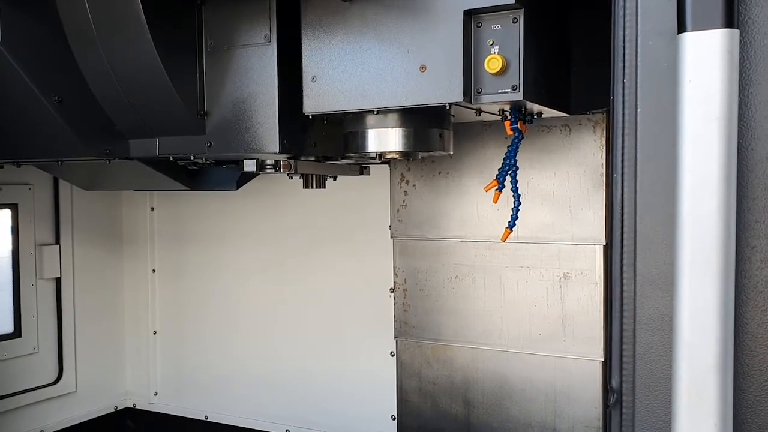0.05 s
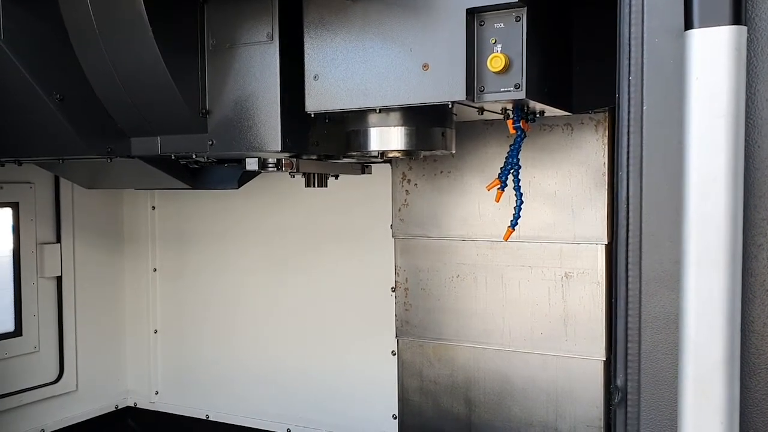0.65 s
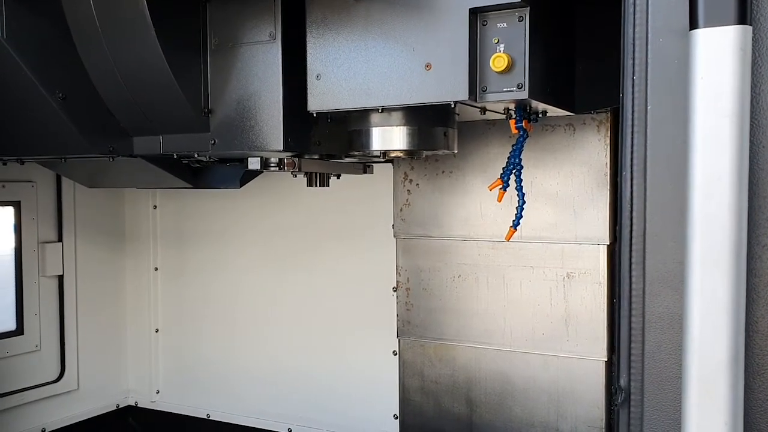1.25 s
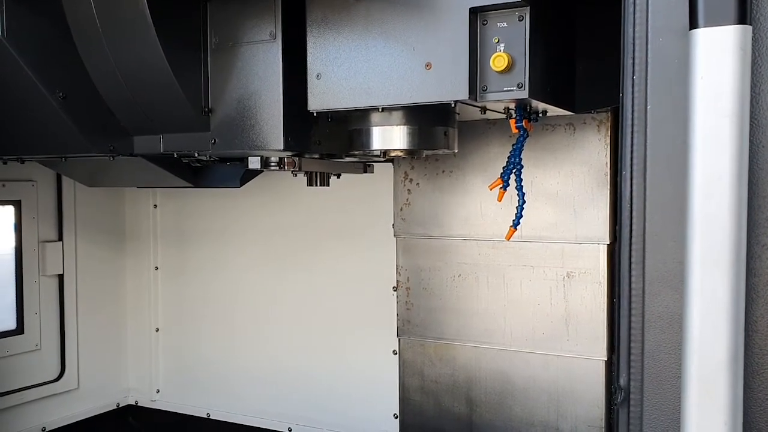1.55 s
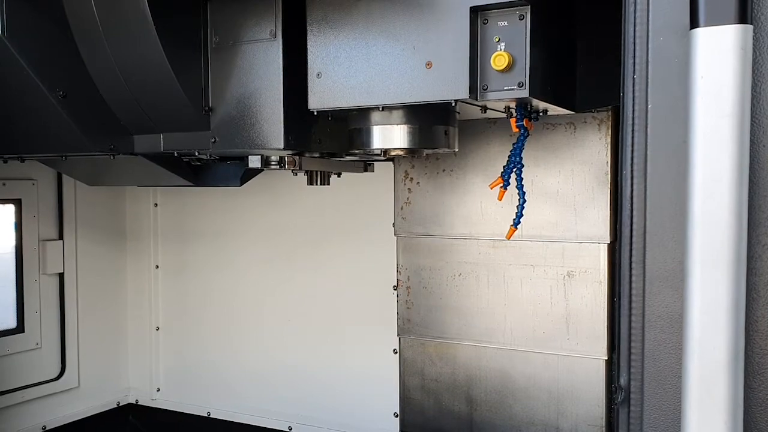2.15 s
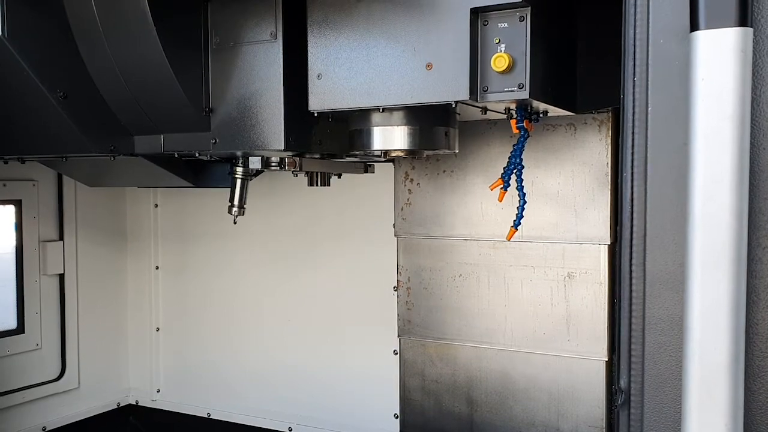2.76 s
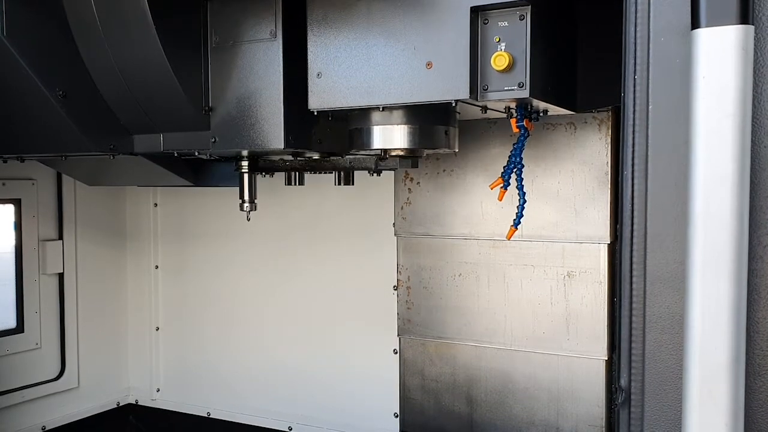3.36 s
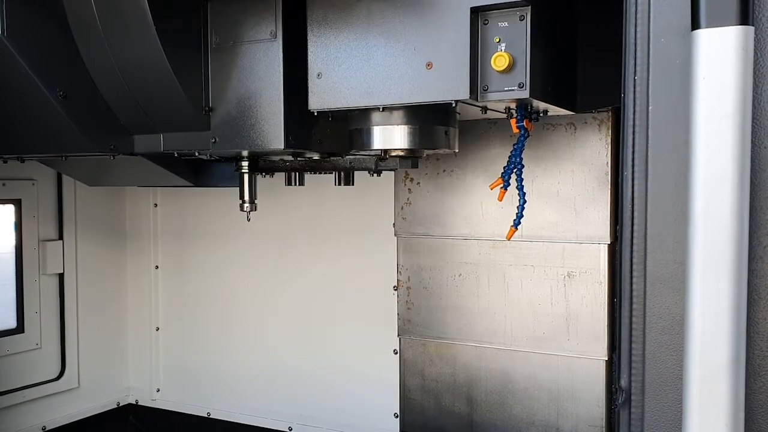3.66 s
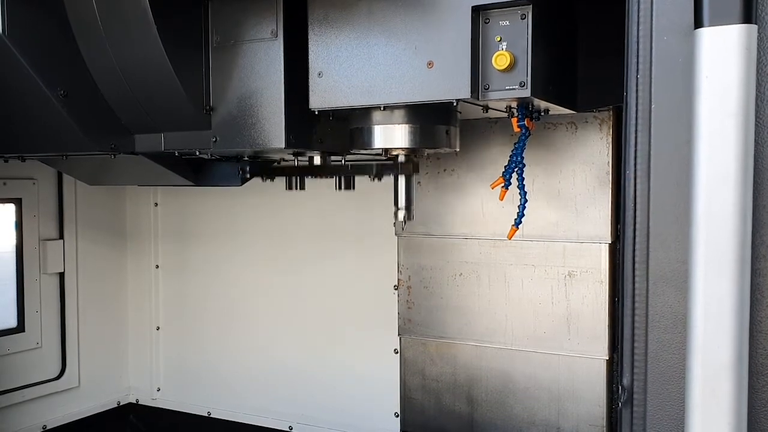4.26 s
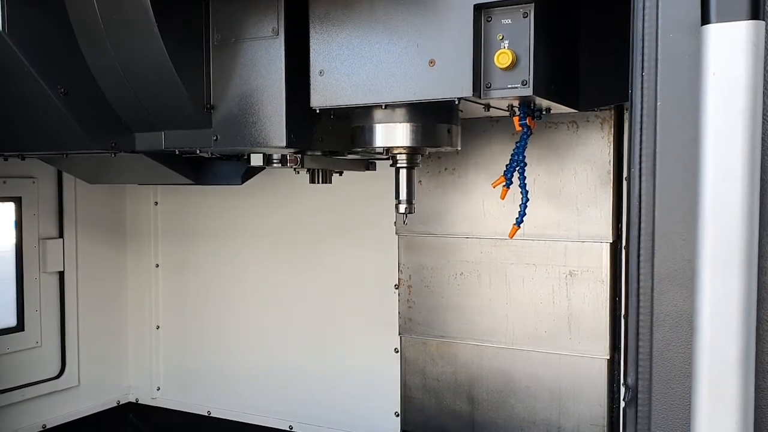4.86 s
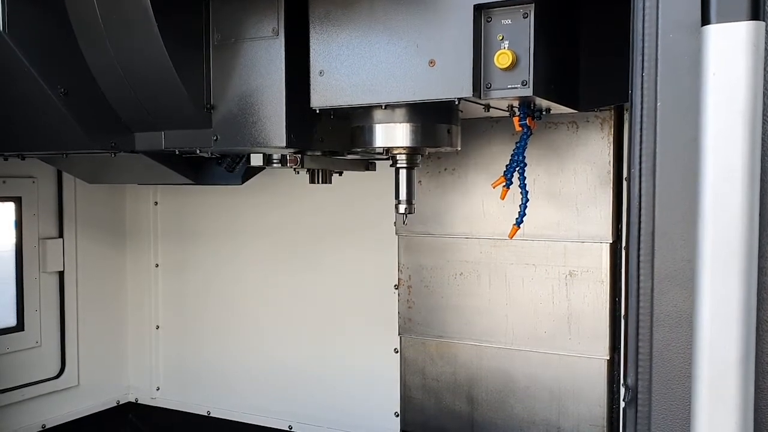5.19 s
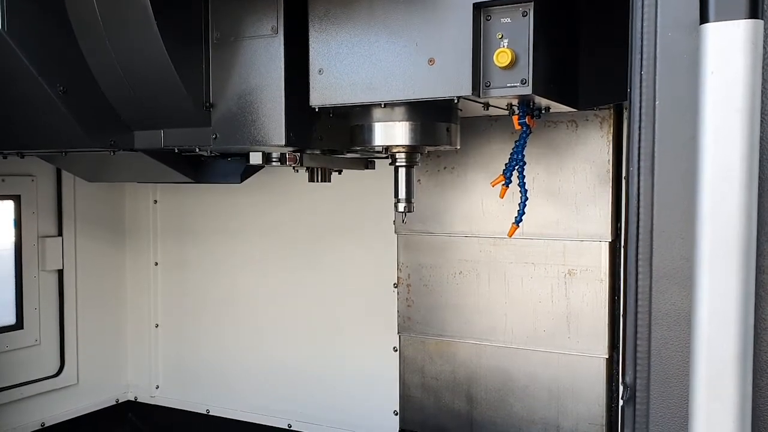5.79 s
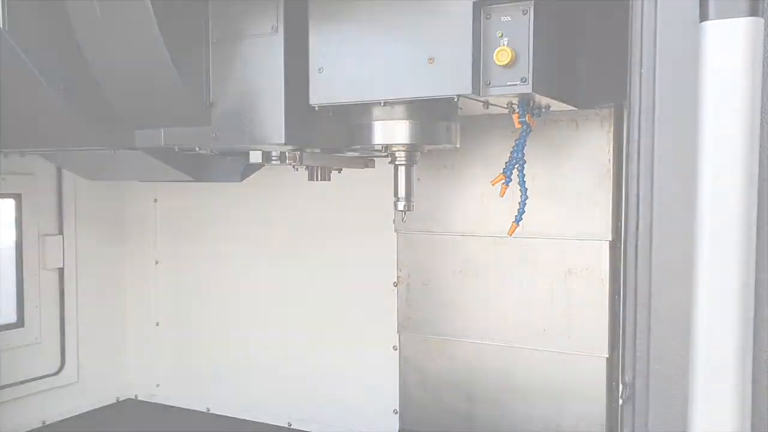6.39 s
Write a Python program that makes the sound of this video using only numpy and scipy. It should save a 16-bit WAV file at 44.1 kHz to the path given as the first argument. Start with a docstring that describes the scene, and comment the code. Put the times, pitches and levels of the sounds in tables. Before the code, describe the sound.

A machine tool hums low and steadily with a thin air leak, heard close at the open door of its sheet-steel cabin. In the first 0.7 seconds a draught buffets the microphone on the right, with one faint rising squeak. At about 2.1 seconds a valve spits, then an air cylinder vents with a clunk and a sharp half-second hiss. From 3.3 seconds the tool changer arm snaps on with a bright click, several metallic knocks and a gearbox rumble. At 3.7 seconds comes the loudest sound, a blast of compressed air that roars, howls and hisses with a very high whistle, over further knocks. It narrows to a hiss and stops at 4.4 seconds, followed by a few clunks. At 4.8 seconds a knock and a softer half-second hiss follow. The hum continues until the end at about 6.4 seconds.

```python
"""Purge air roars, howls and hisses through the empty spindle taper of a machining centre in a tool change.
Heard at the open door of its sheet-steel cabin, over machine hum and a steady air leak. A cylinder
swings the tool pot down, the changer arm rumbles and knocks into the holders, the air blows until the
new tool is clamped, and the pot swings back. Early on, the head squeaks and a draught buffets the
right microphone port."""
import sys
import numpy as np
from scipy import signal
from scipy.fft import rfft, irfft
from scipy.io import wavfile
from scipy.ndimage import uniform_filter1d, map_coordinates

SR = 44100
rng = np.random.default_rng(int(sys.argv[2]) if len(sys.argv) > 2 else 0)


def generate_wav(signal):
    """Clip the signal to [-1, 1] and save it as 16-bit WAV at the path in sys.argv[1]."""
    frames = np.transpose(np.atleast_2d(signal))
    scaled = np.clip(frames, -1, 1) * 32767
    pcm = np.round(scaled).astype(np.int16)
    wavfile.write(sys.argv[1], SR, pcm)


N = 283563
T = np.arange(N) / SR
HZ = np.maximum(np.arange(N // 2 + 1) * SR / N, 1)
SIDES = np.array([[1], [-1]])
PURGE_OPEN_S, HOLDER_FREE_S, HOLDER_SEATS_S, PURGE_SHUT_S = 3.668, 3.724, 4.243, 4.388
SQUEEZE_S, END_S = 0.026, 6.39

# Stereo width in the cabin: freq_hz, side_minus_mid_db
CABIN_WIDTH = [(50, -11.5), (150, -16.5), (400, -10), (750, -4), (1300, -2), (4000, -2), (8000, 1),
               (15000, -4)]
# Background contour: time_s, hum_gain_db, leak_gain_db
IDLE_GAINS = [(.25, -35.5, -38.5), (.45, -36, -41), (.645, -38.5, -41), (.675, -39.5, -45),
              (1.7, -40.5, -44.5), (2.15, -37.5, -41.5), (3.55, -35.5, -43), (4.6, -47, -49.5),
              (5.4, -44.5, -48), (6.3, -39, -41)]
# Machine drone: freq_hz, density_db
HUM_SPECTRUM = [(25, -12), (45, -3.5), (70, 0), (100, -1), (160, -6), (250, -7), (330, -5.5), (480, -12.5),
                (570, -11.5), (660, -15), (1000, -22), (1150, -19), (1800, -27), (2100, -26), (3000, -33),
                (8000, -33)]
# Motor and fan lines: pitch_hz, relative_db
HUM_LINES = [(117, -13), (188, -16), (334, -16), (562, -12), (775, -21), (1120, -21)]
# Spindle air seal: freq_hz, density_db
LEAK_SPECTRUM = [(1500, -9), (3000, -3.5), (5000, -4.5), (7300, -15), (8300, -6.5), (9200, 1), (12000, 1),
                 (14000, -2), (16000, -5.5)]
# Draught rumble: freq_hz, density_db
DRAUGHT_SPECTRUM = [(20, -4), (60, 9.5), (150, 5), (330, -16), (600, -30), (1500, -65)]
# Draught gusts: start_s, end_s, level_db
DRAUGHT_GUSTS = [(0, 0.46, -39), (.345, 0.41, -21.5), (.44, 0.658, -28)]
# Eddies on the right microphone port: time_s, level_db, pitch_hz
EDDIES = [(0.385, -8, 83), (.394, -11, 353), (0.4699, -14.5, 525), (.472, -9.5, 328), (0.475, -4.5, 170),
          (0.483, -8, 256), (0.555, -10, 91)]
# Squeak of the head: time_s, pitch_hz, level_db
SQUEAK_PATH = [(.3, 2250, -75), (.335, 2340, -47), (.352, 2470, -42), (.38, 2850, -62), (.395, 2950, -73)]
# Pilot valve: freq_hz, density_db
VALVE_SPECTRUM = [(1500, -14), (4800, -3.5), (6100, 7), (7500, -11), (10500, 1), (12500, 8.5), (16000, -16)]
# Pilot valve spits: start_s, level_db
VALVE_SPITS = [(2.098, -24.5), (4.817, -33.5)]
# Pot cylinder exhaust: freq_hz, density_db
EXHAUST_SPECTRUM = [(300, -51.5), (800, -4.5), (1400, -1), (2000, -2), (3000, 2), (3700, 0), (5500, -5.5),
                    (7500, -14), (10000, -6.5), (16000, -9.5)]
# Pot swings, down and back: start_s, end_s, exhaust_db, ring_hz, ring_width_hz, ring_db
POT_SWINGS = [(2.168, 2.682, -36, 4270, 280, -40), (4.828, 5.386, -44.5, 3050, 1200, -59)]
# Cam gearbox rumble: freq_hz, density_db
GEARBOX_SPECTRUM = [(25, -12), (50, 6), (90, 2.5), (170, -1), (270, -12.5), (390, 0), (520, -19),
                    (900, -24.5), (2000, -29), (6000, -39.5)]
# Arm strokes (grip, pull, swing, lift, home): middle_s, half_length_s, rumble_db, shudder_db, whirr_db
ARM_STROKES = [(3.316, 0.13, -38, -57, -29), (3.75, 0.059, -29, -27, -60), (3.954, 0.13, -34, -45, -55),
               (4.31, 0.14, -36, -34, -46), (4.562, 0.1, -29, -45, -33)]
# Blows of the tool pot (near 2.2 s and 4.83 s) and of the changer: start_s, thud_db, thud_centre_hz,
# base_t60_s, click_db, tilt_db_per_octave
BLOWS = [(2.171, -20.5, 195, 0.24, -30.5, -2.5), (2.177, -27.5, 560, 0.43, -46, -6),
         (2.203, -35, 100, 0.18, -48, -1), (2.376, -31, 100, 0.092, -54, -4),
         (3.294, -24.5, 520, 0.76, -19.5, 2), (3.311, -25, 420, 0.32, -35.5, -7),
         (3.338, -23.5, 380, 0.23, -44, -1), (3.451, -12.5, 810, 0.09, -25.5, 2.5),
         (3.477, -26, 753, 0.49, -45, 2), (3.488, -24, 520, 0.1, -40, 1), (3.723, -22, 400, 0.14, -29, 8),
         (3.733, -16.5, 224, 0.31, -29, -4), (3.785, -23, 165, 0.24, -18.5, 1),
         (4.296, -23.5, 403, 0.25, -36.5, -6), (4.388, -31.5, 1417, 0.13, -29, 3),
         (4.473, -25, 129, 0.1, -63, 14), (4.530, -36, 83.5, 0.33, -25, 2),
         (4.547, -25.5, 430, 0.22, -61, 3), (4.828, -29, 158, 0.29, -34, -2)]
# Modes of the panels and changer: pitch_hz, weight_db, t60_factor
PANEL_MODES = [(91, 8, 0.79), (150, 5.5, 0.85), (159.6, 15, 1.1), (195, 3, 1.1), (232, 8.5, 0.76),
               (261, 3.5, 0.99), (323, 5.5, 0.98), (371, 2.5, 1.44), (455, 2, 0.42), (505, -14, 0.89),
               (654, 0.5, 0.85), (743, -2.5, 2.05), (906, -4.5, 0.84), (1223, -8.5, 1.5), (1134, -15, 2.6)]
# Steel-on-steel click: freq_hz, density_db
CLICK_SPECTRUM = [(300, 10), (1200, 18.5), (2300, 12), (3200, 13.5), (4500, 13), (6000, 8), (8500, -0.5),
                  (9600, 8), (11000, -11), (16000, -13)]
# Modes of the steel gripper: pitch_hz, relative_db, t60_s
GRIPPER_MODES = [(3340, -43, 0.12), (4480, -35, 0.2), (6632, -38.5, .1)]
# Air column of the taper and the gap under it: centre_hz, width_hz, weight_db
TAPER_MODES = [(731, 64, -3), (802, 60, -6), (898, 97, -8.5), (1126, 130, -11), (1293, 75, -7.5),
               (1475, 70, -6.5), (2070, 86, -5), (2196, 120, -7), (2330, 60, -14), (2800, 110, -16),
               (3210, 84, -10), (3410, 130, -11.5), (4010, 44, -15.5), (5320, 64, -15), (5730, 81, -22),
               (6090, 70, -19)]
# Lowest taper resonance, rising as the gap opens, sinking as it closes: time_s, pitch_hz, level_db
HOWL_PATH = [(3.68, 755, -26), (3.76, 785, -30.5), (3.85, 796, -27.5), (4.04, 798, -24.5), (4.19, 796, -29),
             (4.26, 738.7, -37), (4.30, 723, -33), (4.36, 682, -43)]
# Higher taper resonances, catching in turn: start_s, pitch_hz, level_db, stereo_phase_rad
OVERBLOWN_MODES = [(3.670, 2077, -28.5, 0.1), (3.689, 3406, -27.5, -0.5), (3.70, 5280, -38.5, 0.6)]
# Purge jet hiss: freq_hz, density_db
JET_SPECTRUM = [(500, -11.5), (1000, -14.5), (1700, -6.5), (2500, 0), (3700, 2), (4600, -3.5), (5500, -0.5),
                (7000, -2.5), (8200, -6), (9000, 1), (9700, 6), (11500, 1.5), (14500, -6), (16000, -6)]


def undb(db):
    """Decibels to gain."""
    return 10 ** (np.asarray(db) / 20)


def unit(x):
    """Scale to rms 1."""
    return x / np.sqrt(np.mean(x ** 2))


def pan(left_minus_right_db):
    """Left and right gains."""
    return undb(SIDES * left_minus_right_db / 2)


def curves(rows):
    """Each value column of a timed table, at every sample."""
    times_s, *columns = np.transpose(rows)
    return [np.interp(T, times_s, column) for column in columns]


def burst(start_s, end_s, rise_s, release_s):
    """Envelope: rise, hold, exponential release."""
    attack = 1 - np.exp(-np.maximum(T - start_s, 0) / rise_s)
    return attack * np.exp(-np.maximum(T - end_s, 0) / release_s)


def swell(middle_s, half_s):
    """Bell-shaped envelope."""
    return np.exp(-((T - middle_s) / half_s) ** 2)


def ramp(start_s, length_s):
    """Linear rise from 0 to 1, then held."""
    return np.clip((T - start_s) / length_s, 0, 1)


def walk(rate_hz):
    """Smoothed random steps, spread near 1."""
    step = max(int(SR / rate_hz), 1)
    held = rng.standard_normal(N)[np.arange(N) // step]
    return 1.404 * uniform_filter1d(uniform_filter1d(held, step), step)


def colour(points):
    """Gain per frequency from a spectrum table."""
    hz, db = np.transpose(points)
    return undb(np.interp(np.log(HZ), np.log(hz), db))


def resonance(hz, width_hz):
    """Gain per frequency of one resonance, 1 at its centre."""
    return (1 + ((HZ ** 2 - hz ** 2) / (HZ * width_hz)) ** 2) ** -.5


def tone(hz, phase_rad=0):
    """Sine of rms 1 following a pitch."""
    return np.sqrt(2) * np.sin(2 * np.pi * np.cumsum(hz) / SR + phase_rad)


def noise(gain):
    """Mono turbulence of a given spectrum, rms 1."""
    return unit(irfft(rfft(rng.standard_normal(N)) * gain, N))


def diffuse(gain, width_db=0, ripple_hz=291, wall_share=0.5):
    """Stereo turbulence: near walls shift its phase, late echoes are unrelated, the bass stays alike."""
    direct, late = (rng.standard_normal((2, len(HZ))) + 1j * rng.standard_normal((2, len(HZ)))) * gain
    turns_rad = np.cumsum(np.pi * rng.uniform(-1, 1, size=256))
    wall_phase_rad = np.interp(HZ / ripple_hz, np.arange(256), turns_rad)
    early = 1j * direct * np.sqrt(2) * np.sin(wall_phase_rad)
    echoes = np.sqrt(wall_share) * early + np.sqrt(1 - wall_share) * late
    side = colour(CABIN_WIDTH) * undb(width_db) * echoes
    return unit(irfft(direct + SIDES * side, N))


def band(hz, width_hz):
    """Stereo turbulence through a resonance applied twice."""
    return diffuse(resonance(hz, width_hz) ** 2)


def comb(depth_db=4, spacing_hz=207.5):
    """Irregular spectral peaks and dips from standing waves between the walls."""
    ripple = rng.uniform(-np.sqrt(3), np.sqrt(3), size=256)
    return undb(depth_db * np.interp(HZ / spacing_hz, np.arange(256), ripple))


def waver(x, depth):
    """Unsteady flow pushes resonances up and down."""
    drift = depth * walk(45)
    position = np.arange(N) + np.cumsum(drift - drift.mean())
    return np.array([map_coordinates(channel, [position], mode="mirror") for channel in x])


def cabin(x, wet_db, t60_s=0.36, damping=0.74):
    """Dense stereo reflections between steel walls; the treble dies first."""
    echoes = rng.standard_normal((2, SR))
    dull = signal.sosfilt(signal.butter(2, 4500, fs=SR, output="sos"), echoes)
    fade = undb(-60 * T[:SR] / t60_s)
    tail = (dull * fade + (echoes - dull) * fade ** (1 + damping)) * (T[:SR] > .002)
    response = undb(wet_db) * unit(tail) / np.sqrt(SR)
    response[:, 0] += 1
    return signal.fftconvolve(np.atleast_2d(x), response, axes=1)[:, :N] / np.sqrt(1 + undb(2 * wet_db))


def idle(pump_hz=47.5, throb_end_s=3, boom_start_s=4.75):
    """Fans and motors drone and whine, pumps throb and boom, the spindle's air seal leaks."""
    hum_db, leak_db = curves(IDLE_GAINS)
    drone = diffuse(colour(HUM_SPECTRUM)) * undb(hum_db + 4 + 0.46 * walk(9))
    lines = sum(tone(hz + 6 * walk(40)) * undb(db + 3.9 * walk(22)) for hz, db in HUM_LINES)
    fan_whine = band(2104, 91) * undb(-17.5 + 2 * walk(10))
    hum = drone + (lines + fan_whine) * undb(hum_db)
    throb_gain = undb(-41.5) * burst(0, throb_end_s, .01, 0.18) + undb(-54.5)
    throb = noise(resonance(pump_hz, 5) ** 2) * throb_gain
    boom = band(82, 70) * undb(-65) * burst(boom_start_s, END_S, 0.3, 0.3)
    leak = cabin(diffuse(colour(LEAK_SPECTRUM)), wet_db=-4) * undb(leak_db + 3.5 + 0.64 * walk(13))
    return hum * pan(1) + throb + boom + leak * pan(0.45)


def draught(eddy_half_cycles=0.79, eddy_left_db=-24, ramp_s=0.0071):
    """Gusts rumble on the microphone ports; single eddies thump the right one."""
    eddies = 0
    for time_s, db, hz in EDDIES:
        wave = np.cos(2 * np.pi * (hz * (T - time_s) + rng.random()))
        eddies += undb(db) * swell(time_s, eddy_half_cycles / hz) * wave
    rumble = np.array([noise(colour(DRAUGHT_SPECTRUM)) for _ in range(2)])
    gusts = sum(undb(db) * burst(start_s, end_s, ramp_s, ramp_s) for start_s, end_s, db in DRAUGHT_GUSTS)
    return rumble * gusts * pan(-11.5) + eddies * undb([[eddy_left_db], [0]])


def squeak(jitter_hz=50):
    """One faint rising squeak from the moving head."""
    pitch_hz, level_db = curves(SQUEAK_PATH)
    return cabin(tone(pitch_hz + jitter_hz * walk(360)) * undb(level_db), wet_db=-1) * pan(5.4)


def pot_cylinder(rise_s=0.00066, puff_db=10.5, surge_db=2, overtone_ratio=1.26, rest_ring=0.37):
    """A valve spits, the cylinder vents raggedly; its port rings more as the pot gathers speed."""
    spits = sum(undb(db) * burst(start_s, start_s, rise_s, 0.038) for start_s, db in VALVE_SPITS)
    valve = diffuse(colour(VALVE_SPECTRUM)) * spits
    air = diffuse(colour(EXHAUST_SPECTRUM) * np.sqrt(comb()))
    vent = 0
    for start_s, end_s, exhaust_db, ring_hz, width_hz, ring_db in POT_SWINGS:
        puff = undb(puff_db) * burst(start_s, start_s, rise_s, 0.098)  # stored pressure escapes first
        piston_flow = burst(start_s, end_s, rise_s, 0.081)
        flow = np.hypot(piston_flow, puff)
        speed = np.sin(np.pi * ramp(start_s, end_s - start_s) ** 2.3)  # peaks late, then cushioned
        overtone = undb(-3.5) * resonance(ring_hz * overtone_ratio, width_hz) ** 2
        ring = waver(diffuse(resonance(ring_hz, width_hz) ** 2 + overtone), depth=0.028)
        vent += air * undb(exhaust_db + surge_db * speed) * flow
        vent += ring * undb(ring_db) * (speed + rest_ring * flow)
    return cabin(valve + vent * undb(2.15 * walk(220)), wet_db=-0.5) * pan(1.1)


def changer_arm(start_s=3.2, stop_s=4.8, motor_db=-36.5, casing_hz=392, shudder_hz=66):
    """The motor-driven cam gearbox rumbles; each stroke loads it, shakes the frame, whirrs the gears."""
    motor = undb(motor_db) * burst(start_s, stop_s, 0.17, 0.17)
    load, shake, mesh = sum(undb(levels_db)[:, None] * swell(middle_s, half_s)
                            for middle_s, half_s, *levels_db in ARM_STROKES)
    rumble = diffuse(colour(GEARBOX_SPECTRUM)) * np.hypot(motor, load) * undb(2 * walk(35))
    whirr = band(casing_hz, 150) * mesh * pan(0.82)
    shudder = band(shudder_hz, 60) * shake
    return rumble + whirr + shudder


def knocks(ring_db=-4.5, rattle_db=-2, click_t60_s=0.073, contact_t60_s=0.021, rise_s=0.00037):
    """Blows click steel on steel, ring panels and rattle covers; softer contact favours lower modes."""
    size = 40000
    t = T[:size]
    thuds, clicks = np.zeros(N + size), np.zeros((2, N + size))
    mode_hz, mode_db, t60_factor = np.transpose(PANEL_MODES)[:, :, None]
    covers = np.array([noise(resonance(hz, hz * 0.29) ** 3) for hz in mode_hz[:, 0]])
    steel_spectrum = rfft(diffuse(colour(CLICK_SPECTRUM)))
    for start_s, thud_db, centre_hz, base_t60_s, click_db, tilt_db_per_octave in BLOWS:
        start = int(start_s * SR)
        span = slice(start, start + size)
        weights = undb(mode_db) * np.exp(-(np.log(mode_hz / centre_hz) / 0.79) ** 2)
        detuned_hz = mode_hz * (1 + 0.0062 * rng.standard_normal(mode_hz.shape))
        modes = undb(ring_db) * np.sin(2 * np.pi * detuned_hz * t) + undb(rattle_db) * covers[:, span]
        decays = undb(-60 * t / (base_t60_s * t60_factor))
        thud = np.sum(weights * modes * decays, axis=0) / np.linalg.norm(weights)
        thuds[span] += undb(thud_db) * thud * (1 - np.exp(-t / rise_s))

        tilt = undb(tilt_db_per_octave * np.log2(np.maximum(HZ, 1000) / 4000))
        crack_decay = undb(-60 * t / click_t60_s) + undb(-1 - 60 * t / contact_t60_s)
        crack = irfft(steel_spectrum * tilt, N)[:, span] * crack_decay
        ping = sum(np.interp(hz, HZ, tilt) * undb(db - 60 * t / t60_s) * np.sin(2 * np.pi * hz * t)
                   for hz, db, t60_s in GRIPPER_MODES)
        clicks[:, span] += undb(click_db) * (crack + ping)
    return cabin(thuds[:N], wet_db=-9) * pan(0.72) + cabin(clicks[:, :N], wet_db=1) * pan(1.5)


def latch(start_s=3.294, rise_s=.0002):
    """The gripper's latch snaps round the holder with a short, bright ring."""
    tick = band(11000, 9000) * undb(-18) * burst(start_s, start_s, rise_s, 0.0035)
    ring = band(9600, 580) * undb(-19.5) * burst(start_s, start_s, rise_s, 0.015)
    return cabin(tick + ring, wet_db=-4.5)


def nozzle_whistle(flow, gap_db, pitch_hz=14315, bloom_db=5.5):
    """Edge tone: a clean line in a breathy skirt, swelling while the taper stands wide open."""
    line = tone(pitch_hz + 6 * walk(300), phase_rad=SIDES * 0.55)
    skirt = band(pitch_hz, 130) * undb(-4.5)
    envelope = flow * burst(3.71, HOLDER_SEATS_S, .04, 0.05)
    level_db = -31 + bloom_db * swell(4.01, 0.14) + gap_db + 2 * walk(70)
    return (line + skirt) * envelope * undb(level_db)


def rough_tone(hz, width_hz, phase_rad, roughness=0.26):
    """A self-sounding resonance, roughened by the turbulence that feeds it."""
    turbulence = walk(width_hz) + 1j * walk(width_hz)
    amplitude = np.sqrt(2 - 2 * roughness) + np.sqrt(roughness) * turbulence
    return np.imag(amplitude * np.exp(2j * np.pi * np.cumsum(hz) / SR + 1j * SIDES * phase_rad))


def taper_howl(supply):
    """The lowest resonance howls; higher ones catch in turn and flutter independently."""
    pitch_hz, level_db = curves(HOWL_PATH)
    howl = rough_tone(pitch_hz + 7.5 * walk(90), width_hz=80, phase_rad=0.1)
    howl *= supply * undb(level_db + 2.5 * walk(70))
    for start_s, hz, db, phase_rad in OVERBLOWN_MODES:
        envelope = burst(start_s, HOLDER_SEATS_S, 0.012, SQUEEZE_S) * undb(db + 3.5 * walk(100))
        howl += rough_tone(hz + 35 * walk(100), width_hz=200, phase_rad=phase_rad) * envelope
    return howl


def purge(roar_db=-19, jet_db=-17.5, sag_db_per_s=3.5, jet_lag_s=0.0024, slit_s=0.038):
    """Air blows the empty taper like a stopped pipe; the new holder chokes it, leaving only hiss."""
    supply = burst(PURGE_OPEN_S, PURGE_SHUT_S, .004, 0.019)
    flow = supply * ramp(PURGE_OPEN_S + jet_lag_s, 0.056) ** 2
    sag_db = -sag_db_per_s * (T - PURGE_OPEN_S)  # line pressure sags
    flutter_db = walk(160)  # the jet flaps: roar and hiss swell together
    gap_db = (3 * swell(HOLDER_FREE_S, 0.0032)  # spit: old holder breaks free
              + 4.5 * swell(HOLDER_SEATS_S, SQUEEZE_S)  # flare: gap closes
              - 5 * ramp(HOLDER_SEATS_S, SQUEEZE_S))  # choke: new holder seated

    pipe_power = sum(undb(2 * db) * resonance(hz, width_hz) ** 2.7 for hz, width_hz, db in TAPER_MODES)
    taper_open = burst(PURGE_OPEN_S, HOLDER_SEATS_S - SQUEEZE_S, 0.021, 0.031)
    roar = waver(diffuse(np.sqrt(pipe_power), width_db=-2.5), depth=.012) * taper_open
    roar *= undb(roar_db + sag_db + flutter_db + 0.9 * walk(300))
    jet = diffuse(colour(JET_SPECTRUM) * comb()) * flow * undb(jet_db + sag_db + gap_db)
    sputter = undb(0.7 * flutter_db + 0.5 * walk(570))
    howl = taper_howl(supply)
    slit = band(3370, 1700) * undb(-28.5) * swell(PURGE_SHUT_S - slit_s, slit_s)  # last air past holder
    whistle = nozzle_whistle(flow, gap_db)
    hiss = cabin(jet + slit, wet_db=-2) * sputter
    return (roar + howl) * pan(2.5) + hiss * pan(0.3) + whistle * pan(2.2)


def scene():
    """One tool change."""
    return idle() + changer_arm() + purge() + pot_cylinder() + knocks() + latch() + squeak() + draught()


def record(dry, low_hz=30, top_hz=15850):
    """Gate the sound off at END_S; cut the deepest bass and the top."""
    gated = dry * burst(0, END_S, 0.0003, 0.00023)
    thinned = signal.sosfilt(signal.butter(2, low_hz, "high", fs=SR, output="sos"), gated)
    return signal.sosfilt(signal.ellip(10, .2, 70, top_hz, fs=SR, output="sos"), thinned)


dry = scene()
out = record(dry)
generate_wav(out)
```